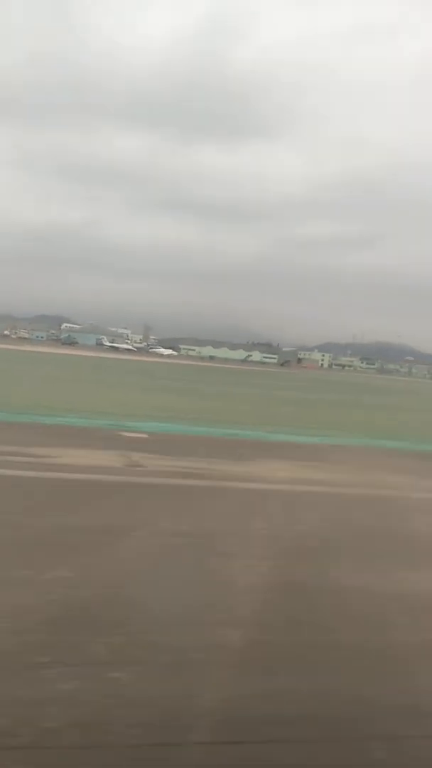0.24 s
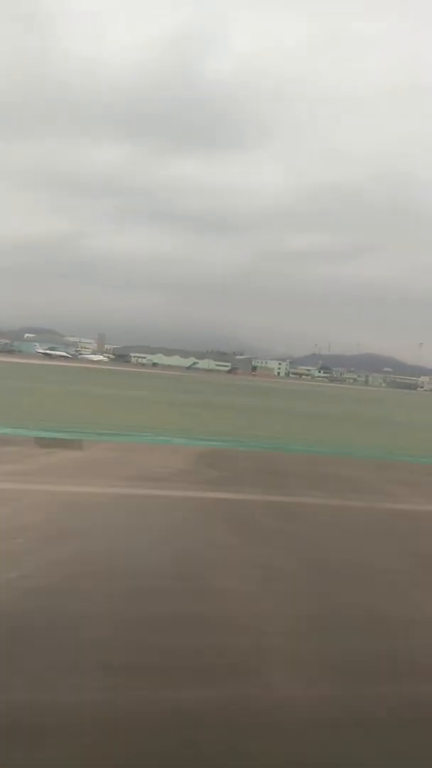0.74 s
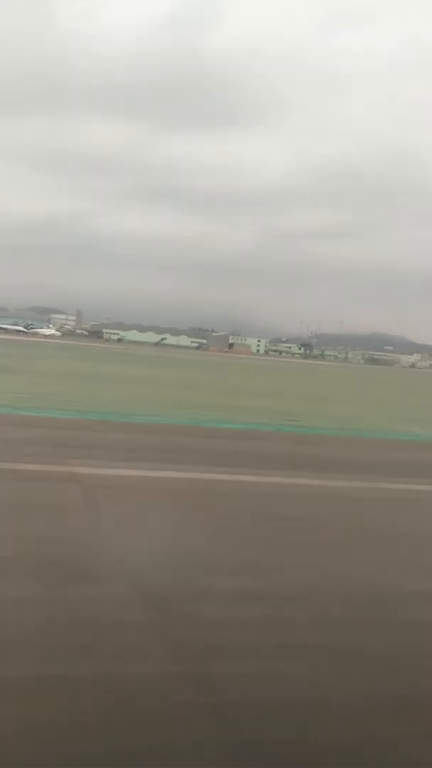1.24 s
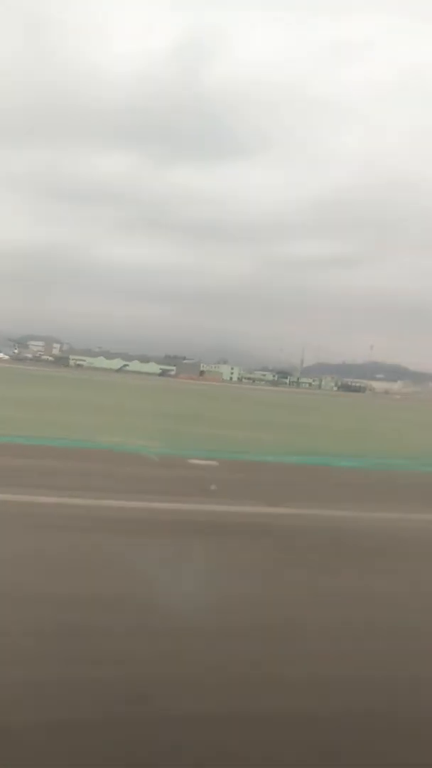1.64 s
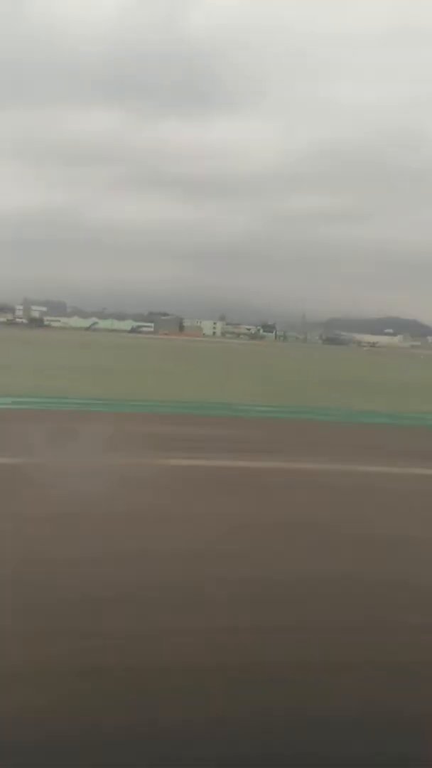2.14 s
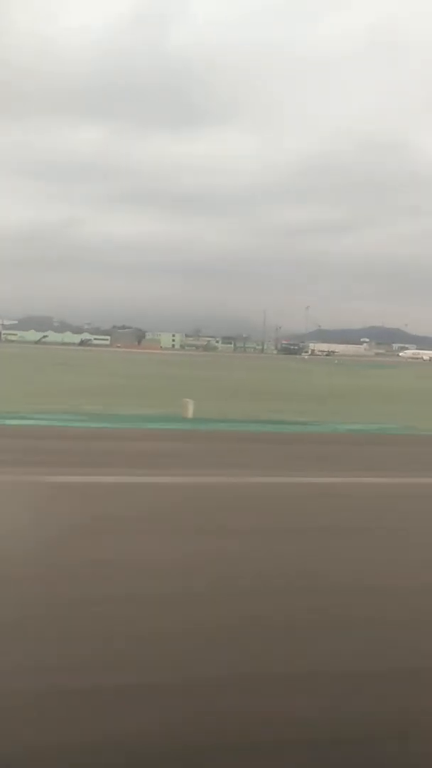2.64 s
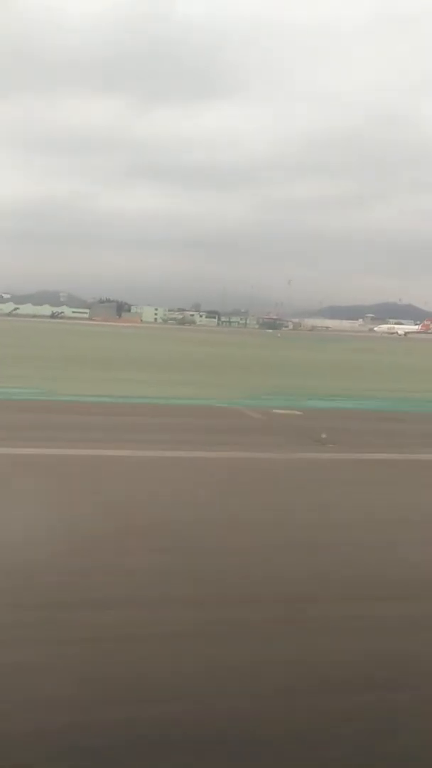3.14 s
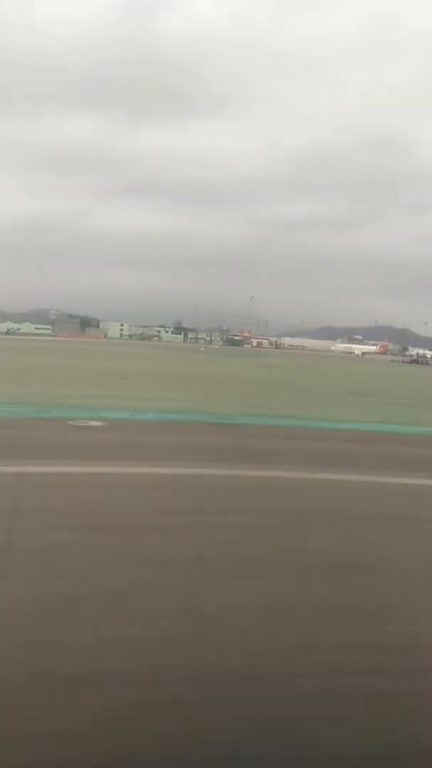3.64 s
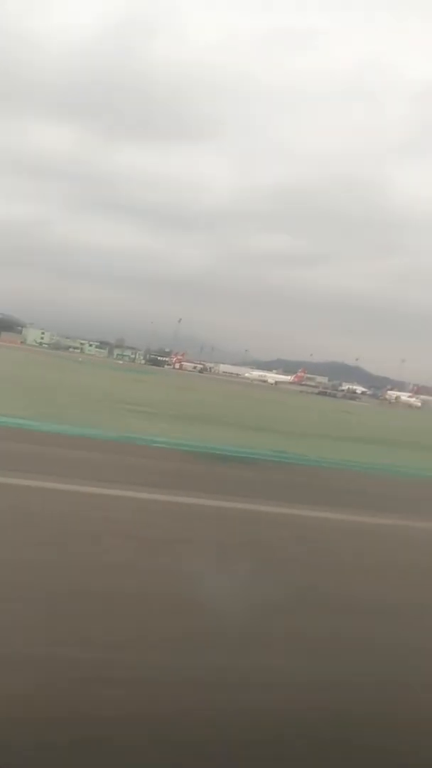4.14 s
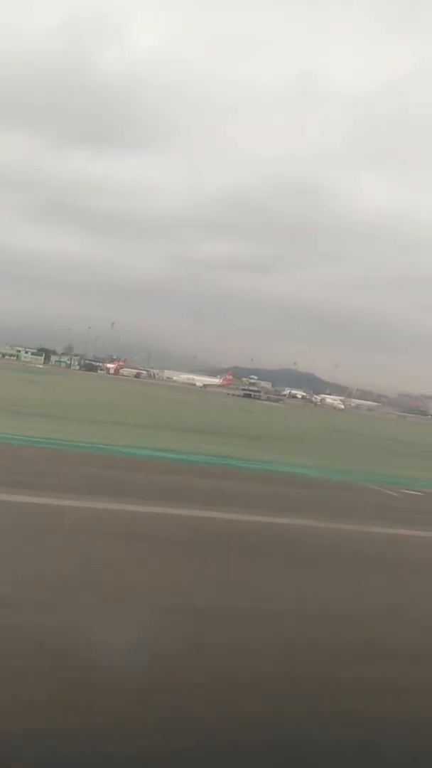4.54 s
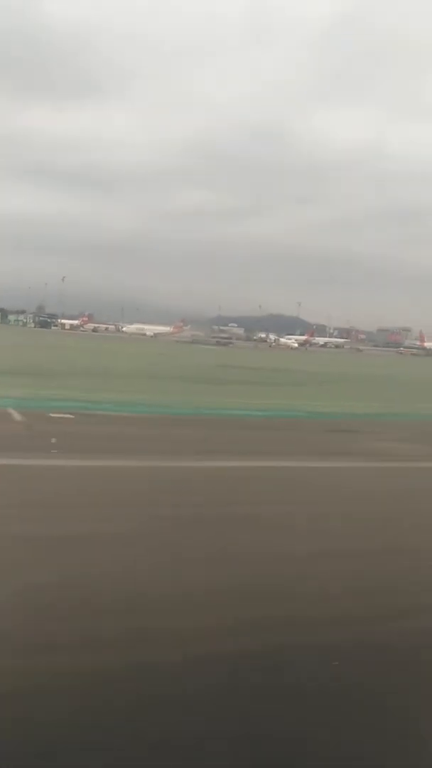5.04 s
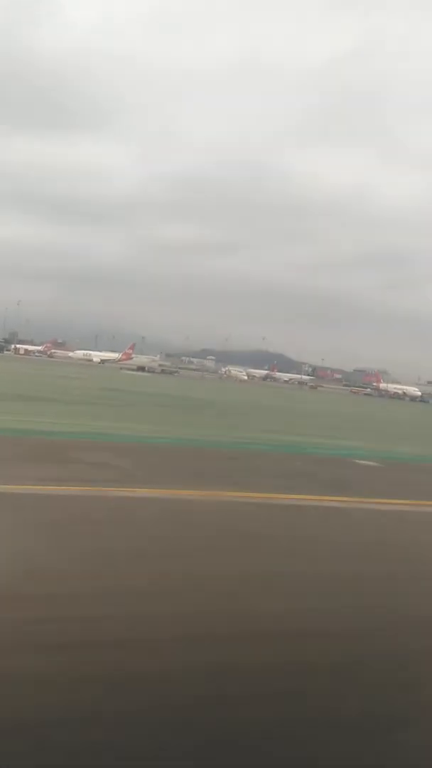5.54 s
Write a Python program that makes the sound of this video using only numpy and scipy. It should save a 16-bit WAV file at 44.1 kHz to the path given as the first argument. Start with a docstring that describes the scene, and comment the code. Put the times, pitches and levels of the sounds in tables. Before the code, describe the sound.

Inside an airliner cabin at a window seat, as the aircraft speeds along the runway after landing, for nearly six seconds. A deep, steady rumble of engines and tyres lies underneath, with a low hum that wavers and swells most around 3.3 to 3.8 s. From the very start, rough tarmac shakes the wall panel in abrupt, uneven bursts, about four a second: it judders, booms hollowly for an instant at the hardest bumps, and hard plastic chatters densely against it. Between bursts the rattle briefly thins as the plastic lifts off. Dry single taps, dull or crisp, stand out from 0.4 s, crowding around 4.3 to 4.5 s. Faint thin sizzles and short lower creaks slip through. Soft deep knocks fall at about 0.1, 0.5, 1.3, 1.6, 1.7, 2.9, 3.2, 5.2 and 5.5 s, the strongest leaning right. The shaking continues to the end, somewhat calmer after 5.5 s.

```python
"""An airliner rolls along the runway after landing, heard from a window seat.
From the start, engines and wheels fill the cabin with a rumble and a wavering hum, made of noise and a sine.
Rough stretches of tarmac, about four a second, shake the wall: it judders, booms briefly at the hardest
bumps, and hard plastic chatters against it. Slips sizzle and creak, and now and then a soft, deep knock falls.
Single hard taps stand out from 0.4 s on."""
import sys
import numpy as np
from scipy import signal
from scipy.fft import rfft, irfft
from scipy.io import wavfile
from scipy.ndimage import uniform_filter1d, minimum_filter1d

SR = 44100
rng = np.random.default_rng(int(sys.argv[2]) if len(sys.argv) > 2 else 0)


def file_out(sig):
    """Save sig as 16-bit WAV at sys.argv[1]."""
    # one column per channel
    cols = np.atleast_2d(sig).T
    # limit, then scale
    lim = np.clip(cols, -1, 1)
    pcm = np.round(lim * 32767).astype(np.int16)
    wavfile.write(sys.argv[1], SR, pcm)


N = 255339
TIME = np.arange(N) / SR  # seconds

# Rough stretches of tarmac. Each row: start in seconds, length in seconds, relative level of the wall judder
# in dB, relative level of the chatter in dB, how long the plastic lifts off just before the start in seconds.
STRETCHES = [(0.010, .215, -24.5, -41, 0.0037), (0.247, 0.069, -24.5, -41.5, 0.009),
             (0.369, 0.16, -25.5, -37.5, 0.034), (0.644, .148, -23.5, -35.5, 0.033),
             (0.844, .08, -25, -37, 0.0067), (0.997, 0.057, -25, -37, 0.0045),
             (1.09, 0.074, -22.5, -41, 0.01), (1.272, .28, -26, -41.5, 0.0042),
             (1.624, .19, -26.5, -42, 0.014), (1.948, .18, -25.5, -41, 0.013),
             (2.218, 0.27, -28.5, -41.5, 0.0029), (2.629, .045, -25.5, -36.5, .005),
             (2.746, .25, -23, -39.5, 0.019), (3.028, .145, -24.5, -39.5, 0.0038),
             (3.3, .143, -24.5, -40.5, 0.037), (3.629, .035, -23, -41.5, 0.0055),
             (3.729, .075, -18, -42, 0.0045), (3.903, .185, -27, -37.5, 0.04),
             (4.108, 0.1, -28, -38, 0.026), (4.395, 0.135, -28, -34.5, .006),
             (4.681, .2, -22, -41.5, 0.0073), (5.099, .11, -25.5, -43, 0.0062),
             (5.280, 0.057, -24, -44, 0.0039), (5.419, 0.051, -22, -39.5, .005)]
# The hardest bumps, which make the wall boom. Each row: middle in seconds, relative level in dB,
# pitch in Hz (it drifts around this), length in seconds.
BOOMS = [(0.036, -11, 282.8, 0.01), (0.094, -15.5, 191, 0.017), (0.139, -11.5, 215.7, 0.014),
         (0.175, -12.5, 238.1, .023), (0.261, -17, 280.8, 0.027), (0.392, -13, 219.9, .029),
         (0.455, -20, 342.2, .016), (0.519, -18.5, 282.5, 0.011), (0.755, -13.5, 276.1, 0.032),
         (0.913, -22, 291.4, 0.018), (1, -20, 375.3, .02), (1.108, -17, 189.8, .02),
         (1.132, -12.5, 260, .02), (1.376, -17, 257.4, 0.011), (1.535, -19.5, 301.1, 0.025),
         (1.752, -13, 250.4, .047), (1.895, -17, 223.8, 0.019), (1.992, -17.5, 322.2, 0.056),
         (2.235, -18, 294.4, .016), (2.66, -17, 217, 0.023), (2.764, -17, 350.2, .014),
         (2.808, -17, 263.8, 0.024), (2.85, -17, 188.3, .047), (2.905, -17, 270.2, .024),
         (2.948, -14, 280.6, .017), (2.984, -15, 272.2, 0.012), (3.09, -21.5, 321.3, 0.024),
         (3.345, -20, 249.8, .02), (3.385, -19, 278.5, 0.018), (3.522, -17, 275.2, 0.008),
         (3.751, -14.5, 281.1, 0.026), (3.779, -16.5, 212.9, 0.021), (4.007, -16.5, 287.1, 0.025),
         (4.193, -17, 215.4, .034), (4.241, -15, 192.3, 0.014), (4.398, -18, 337.2, .008),
         (4.436, -17, 220.2, .009), (4.466, -13.5, 301.4, 0.016), (4.528, -17, 381, .008),
         (4.771, -20, 210.7, 0.033), (4.823, -12.5, 252, 0.012), (4.862, -18, 319, 0.017),
         (5.121, -19, 305.2, 0.045), (5.429, -17, 246.9, 0.017)]
# Single hard taps of the plastic. Each row: time in seconds, relative level in dB,
# crispness (extra treble near 3000 Hz) in dB.
HARD_TAPS = [(0.3997, -26.5, 4), (0.4625, -30.5, 8), (0.5507, -25, -5), (0.611, -36.5, -8.5),
             (0.622, -40, -7), (0.6334, -35.5, 8.5), (0.6532, -34, 14), (0.6648, -34.5, 12),
             (0.7354, -29.5, 6), (0.8209, -46, 9.0), (0.8664, -25, 0), (0.8843, -25, -7), (0.9419, -41, 11),
             (1.0002, -36, 7), (1.0165, -22, -6.0), (1.0412, -34, -3), (1.0687, -31, 6), (1.1385, -39, 5),
             (1.1579, -32.5, 9), (1.2591, -29, 0), (1.3727, -25.5, 0), (1.5205, -27, 0),
             (1.5818, -33.5, 12), (1.6197, -29, -1), (1.884, -28, 3), (2.0162, -32, 5.5), (2.185, -36, 6),
             (2.3768, -27.5, 2.0), (2.5868, -34, 2.5), (2.6603, -31, -7), (2.7001, -49, 7),
             (2.7533, -34, -9), (2.8578, -31.5, 9), (3.0325, -32.5, 4), (3.3074, -29, -9),
             (3.421, -36, -12), (3.52, -36.5, 15), (3.6337, -32.5, -1), (3.7854, -30.5, -14),
             (3.9719, -27.5, 3), (4.0008, -22.5, -12), (4.0309, -38, 9), (4.0532, -28.5, 2.5),
             (4.1463, -26, -1), (4.2974, -29.5, -5.5), (4.3078, -32, -12), (4.3114, -44, -1),
             (4.331, -34, -5), (4.349, -34, 4), (4.3532, -33.5, -2), (4.3834, -35, 11), (4.3963, -25.5, 9),
             (4.4133, -26, 1.0), (4.4323, -29, 1), (4.4566, -27.5, 2), (4.4826, -30, 0),
             (4.5207, -30.5, 10), (4.5242, -27.5, 9.5), (4.6306, -29.5, -6), (4.822, -31, -8.5),
             (4.862, -28.5, -4.0), (4.8984, -31, 1), (4.924, -31, -3), (5.3861, -35, 3)]
# Tone of the plastic tapping the wall. Each row: frequency in Hz, relative level in dB.
TAP_TONE = [(40, -1), (130, 2), (310, 6), (410, 5.5), (490, 3), (660, -0.5), (1000, -8), (1500, -15),
            (2100, -21), (3000, -31), (4200, -43), (6200, -48.5), (8500, -62), (13000, -83.5)]
# How much left and right differ for the plastic. Each row: frequency in Hz, opposed minus shared part in dB.
TAP_WIDTH = [(100, -12), (300, -8.5), (600, -5), (1200, -0.5), (3000, 3), (9000, 1.5)]


def gain_of(db):
    """Turns decibels into amplitude."""
    return 10 ** (np.asarray(db) / 20)


def evened(x):
    """Scales a signal to an rms (average strength) of one."""
    return x / np.sqrt(np.mean(x ** 2) + 1e-20)


def read(points, hz):
    """Reads a spectrum between its points, along a log-frequency axis."""
    f, value = np.transpose(points)
    return np.interp(np.log(hz + 1), np.log(f + 1), value)


def colour(x, points, size=8192):
    """Filters to the given spectrum, causally: it rings only after it is struck."""
    hz = abs(np.fft.fftfreq(size, 1 / SR))
    log_gain = np.log(gain_of(read(points, hz)))
    minimum_phase = np.exp(np.conj(signal.hilbert(log_gain)))
    response = np.fft.ifft(minimum_phase).real[:size // 2]
    return signal.oaconvolve(x, response)[:len(x)]


def ring_strength(points):
    """How much a filter changes the strength of a single click; dividing by it leaves that strength alone."""
    return np.linalg.norm(colour(signal.unit_impulse(SR), points))


def smooth(x, seconds):
    """Triangular running mean: two plain running means of the given length, one after the other."""
    width = max(int(seconds * SR), 1)
    return np.maximum(uniform_filter1d(uniform_filter1d(x, width), width), 0)


def wander(hz):
    """Slow random motion with an rms of one, up to about the given rate."""
    size = 2 ** 18
    spectrum = rfft(rng.standard_normal(size))
    slow = np.exp(-(np.fft.rfftfreq(size, 1 / SR) / hz) ** 2)
    return evened(irfft(spectrum * slow)[:N])


def noise(points):
    """Noise of the given spectrum with an rms of one; the first second, where the filter starts, is dropped."""
    return evened(colour(rng.standard_normal(N + SR), points)[SR:])


def left_right(mid, side):
    """Makes left and right from their shared and opposed parts."""
    return np.array([mid + side, mid - side])


def swell(s, length):
    """The samples of a short event and its bell-shaped rise and fall; length is the width at half height."""
    at = np.flatnonzero(abs(TIME - s) < 2 * length)
    return at, .5 ** ((2 * (TIME[at] - s) / length) ** 2)


def surge(depth_db, rate_hz, span_s):
    """Uneven spurts of strength that roughly keep the mean power over span_s."""
    spurts = gain_of(depth_db * wander(rate_hz))
    return spurts / np.sqrt(smooth(spurts ** 2, span_s) + 1e-6)


def shaking(column):
    """Amplitude of the wall judder (column 1) or chatter (column 2): calm, but for the rough stretches."""
    # Shaking on the smoother tarmac in between.
    # Each row: time in seconds, relative level of the wall judder in dB, relative level of the chatter in dB.
    calm_levels = np.array([(0, -33, -41), (1.3, -32.5, -41.5), (2.5, -33.5, -43.5), (3.8, -37.5, -45),
                            (4.7, -28.5, -41), (5.2, -33, -46), (5.79, -32, -48.5)])
    early_s, attack_s, release_s = 0.0018, 0.0039, 0.013  # starts abruptly, holds, and dies away
    calm = gain_of(np.interp(TIME, calm_levels[:, 0], calm_levels[:, column]))
    level = calm
    for row in STRETCHES:
        t = TIME - row[0] + early_s
        rise = np.clip(t / attack_s, 0, 1)
        fall = np.exp(-np.maximum(t - row[1], 0) / release_s)
        level = np.maximum(level, calm + rise * fall * (gain_of(row[1 + column]) - calm))
    return level


def cabin(level_db=-30, waver=0.012, throb_db=2):
    """Engines and tyres through the fuselage: deep, steady noise with a wavering hum in it."""
    # Tone of the rumble. Each row: frequency in Hz, relative level in dB.
    rumble_tone = [(20, -16), (32, -25), (44, -1), (53, 5.5), (72, 4), (105, 7.5), (150, -0.5), (230, -9.5),
                   (390, -22), (500, -27), (1000, -38), (2000, -50), (4500, -60), (9000, -80)]
    # How much left and right differ. Each row: frequency in Hz, opposed minus shared part in dB.
    rumble_width = [(30, -21.5), (70, -24.5), (150, -12), (300, -7), (600, -3.5), (1500, 8), (8000, -1.5)]
    # The deep hum rises and sinks. Each row: time in seconds, pitch in Hz (before the waver), level in dB.
    hum_path = [(0, 53.86, -50.5), (1.4, 57, -44), (2.4, 54, -50), (3.301, 56.6, -36),
                (3.802, 49.33, -36.5), (4.3, 49.6, -42), (4.9, 55.8, -39.5), (5.2, 56.7, -45.5),
                (5.5, 48.45, -42.5), (5.79, 48.4, -50)]
    s, pitch, hum_db = np.transpose(hum_path)
    hz = np.interp(TIME, s, pitch) * (1 + waver * wander(5))
    throb = gain_of(throb_db * wander(3.6))
    hum = evened(throb * np.sin(2 * np.pi * np.cumsum(hz) / SR))
    rumble = left_right(noise(rumble_tone), colour(noise(rumble_tone), rumble_width))
    return gain_of(level_db) * rumble + gain_of(np.interp(TIME, s, hum_db)) * hum


def wall(drive, judder_db=1.5, boom_db=1.5, glide=0.13, glide_hz=75, rough=0.33):
    """The wall panel judders all the time and swings for a few uneven cycles at each hard bump."""
    # Tone of the judder. Each row: frequency in Hz, relative level in dB.
    judder_tone = [(50, -31.5), (95, -2), (170, 5), (300, 6.5), (400, 0.5), (500, -13.5), (700, -20.5),
                   (1000, -25.5), (1600, -76.5)]
    # How much left and right differ. Each row: frequency in Hz, opposed minus shared part in dB.
    wall_width = [(100, -22), (300, -14), (450, -18), (700, -16), (1500, -5)]
    judder = noise(judder_tone)
    judder /= np.sqrt(smooth(judder ** 2, 0.061) + 1e-6)  # flatten the noise's own slow swells
    level = gain_of(judder_db) * shaking(column=1) * drive
    mid, power = level * judder, level ** 2
    drift, uneven = np.exp(glide * wander(glide_hz)), 1 + rough * wander(130)
    for (s, db, hz, length), start in zip(BOOMS, rng.random(len(BOOMS))):
        at, bell = swell(s, length)
        swing = bell * uneven[at]
        # uneven, but as strong as a plain bell
        swing *= gain_of(db + boom_db) * np.linalg.norm(bell) / np.linalg.norm(swing)
        turns = start + np.cumsum(hz * drift[at]) / SR
        mid[at] += np.sqrt(2) * swing * np.sin(2 * np.pi * turns)
        power[at] += swing ** 2
    side = colour(np.sqrt(power) * noise(judder_tone), wall_width)
    return left_right(mid, side)


def seated(depth_db=-13, tap_share=0.32):
    """How firmly the plastic rests on the wall: it lifts before rough stretches and hard taps, and in lulls."""
    # Lulls on smooth tarmac, when the plastic hangs free. Each row: middle in seconds, length in seconds.
    free_times = [(0.345, .02), (0.572, 0.014), (0.62, .02), (0.806, .016), (1.232, .014), (2.416, .015),
                  (2.729, 0.014), (3.267, .022), (3.459, 0.017), (3.856, .028), (4.3, .025), (4.335, .025),
                  (4.545, .012), (4.665, .01), (5.005, 0.022)]
    tap_lift_s = .01  # the plastic is in the air this long before a hard tap
    lifts = [(start - lift / 2, lift, 1) for start, _, _, _, lift in STRETCHES]
    lifts += [(s - tap_lift_s / 2, tap_lift_s, tap_share) for s, _, _ in HARD_TAPS]
    lifts += [(s, length, 1) for s, length in free_times]
    lifted = np.zeros(N)
    for s, length, share in lifts:
        at, bell = swell(s, length)
        lifted[at] += share * np.minimum(2 * bell ** 2, 1)
    return gain_of(depth_db * np.minimum(lifted, 1))


def bounces(rate, uneven, count=16000):
    """One click at each bounce, at the given rate a second; the flights in between are of uneven length."""
    flights = np.exp(uneven * rng.standard_normal(count))
    at = np.searchsorted(np.cumsum(rate) / SR, np.cumsum(flights / flights.mean()))
    return np.bincount(at[at < N], minlength=N)


def contact(blows, hard_db, scatter=0.79, edge_hz=2200, size=256):
    """One point of contact: a dry click that fades in about a millisecond; a hard point is brighter."""
    t = np.arange(size) / SR
    near, across = rng.standard_normal((2, size)) * np.exp(-t / .00035)
    near = scatter * near / np.linalg.norm(near) + (t == 0)
    pair = np.array([near / np.linalg.norm(near), across / np.linalg.norm(across)])
    clicks = evened(pair) / np.sqrt(size)
    treble = signal.lfilter(*signal.butter(1, edge_hz, "high", fs=SR), clicks)
    clicks = clicks + (gain_of(hard_db) - 1) * treble
    sides = rng.choice([-1., 1.], N)  # each blow leans to left or right
    return signal.oaconvolve(np.array([blows, blows * sides]), clicks, axes=1)[:, :N]


def clacks(level_db, spill=0.48, spill_s=0.00065, soft_hz=4000, size=256):
    """Hard single taps and landings: a click, dull or crisp, inside a very short scrape."""
    landing_db = 0.5  # the tap that opens each rough stretch, added to that stretch's chatter level
    out = np.zeros((2, N + size))  # shared and opposed parts
    t = (np.arange(size) - size // 2) / SR
    hits = [*HARD_TAPS] + [(start, db + landing_db, 0) for start, _, _, db, _ in STRETCHES]
    for (s, db, crisp_db), scatter in zip(hits, rng.standard_normal((len(hits), 2, size))):
        click = scatter * np.exp(-abs(t) / spill_s)
        click *= spill / np.linalg.norm(click[0])
        click[0] -= t == 0
        tone = [(400, -6), (1400, 0), (3000, crisp_db), (9000, 0)]  # Hz, dB
        click = np.array([colour(part, tone, size=512) for part in click])
        first = round((s + t[0]) * SR)
        out[:, first:][:, :size] += gain_of(db + level_db) * click
    out = signal.lfilter(*signal.butter(1, soft_hz, fs=SR), out)  # the plastic gives a little
    return out[:, :N] / ring_strength(TAP_TONE)


def chatter(drive, taps_per_s=400, crowding=.45, uneven=.55, spread_db=3.5, rub=0.1, base_db=9.5,
            boom_db=-14.5, clack_db=29, hard_db=5, roam=4, roam_hz=9, count=16):
    """Plastic bounces on the wall: sparser taps when calm, denser in every boom; it rubs more if shaken hard."""
    usual_hz = 260  # boom pitch at which the rattle has its plain strength
    power = (gain_of(base_db) * shaking(column=2) * drive) ** 2
    for s, db, hz, length in BOOMS:
        at, bell = swell(s, length)
        power[at] += (gain_of(db + boom_db) * bell * hz / usual_hz) ** 2  # a faster swing rattles harder
    force = np.sqrt(power)
    pressure = force / np.median(force)
    sizes_db = spread_db * np.clip(rng.standard_normal(N), -2, 2)
    taps = bounces(taps_per_s * pressure ** crowding, uneven) * gain_of(sizes_db)
    taps /= np.sqrt(smooth(taps ** 2, 0.0039) + 0.38 * np.mean(taps ** 2))  # a few big bounces or many small
    rubbing = rub * np.minimum(pressure, 2) * rng.standard_normal(N)
    blows = force * (rubbing - taps)
    blows /= ring_strength(TAP_TONE)
    # the point of contact roams between soft and hard spots, so the tone of the flurries varies
    point = np.floor(roam * wander(roam_hz) + 2.5 * rng.standard_normal(N)) % count
    hardness = rng.permutation(np.linspace(-2 * hard_db, hard_db, count))
    struck = sum(contact(blows * (point == k), hardness[k]) for k in range(count))
    mid, side = struck + clacks(clack_db)
    return left_right(colour(mid, TAP_TONE), colour(colour(side, TAP_TONE), TAP_WIDTH))


def ticks(seat, per_s=120, level_db=-16, spread_db=3.5, follow=0.72):
    """The edge of the plastic touches the wall at random in light ticks, stronger the more it shakes."""
    # Tone of a tick. Each row: frequency in Hz, relative level in dB.
    tick_tone = [(60, -2.5), (300, 3.5), (700, 3.5), (1500, -5), (3000, -23.5), (4200, -28.5),
                 (6200, -40.5), (9000, -54.5), (13000, -71.5)]
    shake = shaking(column=2)
    firmness = (shake / np.median(shake)) ** follow * seat ** 0.43
    sizes = gain_of(level_db + spread_db * np.clip(rng.standard_normal(N), -2, 2))
    touches = (rng.random(N) < per_s / SR) * sizes * firmness
    shares = 1 + 0.45 * rng.uniform(-2.1, 1, (2, N))  # each tick reaches left and right unequally
    return np.array([colour(-touches * share, tick_tone) for share in shares]) / ring_strength(tick_tone)


def scuff(seat, level_db=-58.5, follow=0.8):
    """The plastic scuffs the wall with a faint hiss that grows with the shaking and sinks when it lifts."""
    # Tone of the hiss. Each row: frequency in Hz, relative level in dB.
    hiss_tone = [(200, -13), (700, 0.5), (1200, -1.5), (2000, 2), (3400, -4), (4500, -13), (6000, -21),
                 (9000, -42.5)]
    shake = shaking(column=2)
    strength = gain_of(level_db) * (shake / np.median(shake)) ** follow * seat
    return strength * np.array([noise(hiss_tone), noise(hiss_tone)])


def slips(sharp=14, width_hz=400, flutter_db=3):
    """Plastic slips on the wall: bursts of fluttering, narrow noise, as thin sizzles or short, lower creaks."""
    # Each row: middle in seconds, length in seconds, centre frequency in Hz, relative level in dB.
    slip_list = [(0.033, 0.033, 6000, -64), (0.041, 0.022, 1004, -36.5), (0.13, 0.093, 5512, -67.5),
                 (0.135, 0.0089, 12020, -68), (0.309, 0.021, 5720, -68.5), (0.403, 0.059, 5650, -66.5),
                 (0.417, .012, 614.3, -40), (0.674, 0.056, 6660, -75), (0.73, 0.15, 5524, -67.5),
                 (0.784, 0.017, 803, -43), (0.886, 0.012, 622, -33), (0.909, 0.11, 5450, -68),
                 (1.017, 0.021, 940, -39), (1.021, 0.12, 5485, -69), (1.048, 0.046, 1496, -42.5),
                 (1.148, 0.041, 5652, -66), (1.16, 0.019, 1357, -37), (1.735, 0.12, 5410, -70.5),
                 (2.014, 0.035, 5440, -68.5), (2.464, 0.078, 5630, -74), (2.7646, .012, 611, -37.5),
                 (2.8065, 0.013, 598.5, -38), (3.318, 0.043, 5430, -71.5), (3.646, .012, 599.4, -37.5),
                 (3.961, 0.011, 651, -37), (4.004, 0.015, 1031, -34), (4.157, 0.11, 6220, -76),
                 (4.397, 0.0093, 7294, -68), (4.4156, 0.01, 678, -33), (4.425, 0.068, 6670, -73),
                 (4.8225, .012, 651.4, -34), (4.8635, 0.014, 622, -45), (5.12, 0.029, 694.4, -43)]
    out, flutter = np.zeros((2, N)), evened(gain_of(flutter_db * wander(200)))
    for s, length, hz, db in slip_list:
        at, bell = swell(s, length)
        half = min(width_hz + hz / sharp, hz) / 2
        band = signal.butter(2, [hz - half, hz + half], "band", fs=SR, output="sos")
        ringing = signal.sosfilt(band, rng.standard_normal((2, SR)))[:, -len(at):]
        mid, side = ringing * bell * flutter[at]
        ring = left_right(mid, gain_of(read(TAP_WIDTH, hz)) * side)
        out[:, at] += gain_of(db) * ring * np.linalg.norm(bell) / np.linalg.norm(mid)
    return out


def knocks(length_s=0.026, sag_per_s=7):
    """Soft, deep knocks: each is a few slow sine cycles that sag in pitch, with no rattle."""
    # Each row: middle in seconds, level on the right in dB, pitch at the middle in Hz, left minus right in dB.
    knock_list = [(0.11, -26, 146.2, -3.5), (0.479, -26.5, 105.4, 2.5), (1.318, -13.5, 108.2, -13.5),
                  (1.567, -21.5, 101.4, -0.5), (1.682, -14, 107.1, -16), (2.866, -20, 135, 4),
                  (3.195, -21.5, 104.3, -4.5), (5.223, -22.5, 99.78, -7), (5.467, -19.5, 100.8, 2)]
    out = np.zeros((2, N))
    for (s, db, hz, left_db), start in zip(knock_list, rng.random(len(knock_list))):
        at, bell = swell(s, length_s)
        turns = start + np.cumsum(hz * np.exp(-sag_per_s * (TIME[at] - s))) / SR
        out[:, at] += np.sqrt(2) * gain_of([[db + left_db], [db]]) * bell * np.sin(2 * np.pi * turns)
    return out


def scene(wall_lift=1.0, chatter_lift=.9, scuff_lift=.45, shared=.35):
    """Adds up all sounds; small bumps and the grain of the tarmac move wall and chatter by their own amounts."""
    # Resonances of the wall panel, heard in everything that shakes it. Each row: frequency in Hz, gain in dB.
    panel_tone = [(135, 0.5), (195, 2), (258, -4.5), (315, 1.5), (348, -0.5), (395, 2), (480, -1.5),
                  (640, -1), (950, -2.5), (1700, -4), (3200, -2)]
    bumps = surge(depth_db=2.5, rate_hz=32, span_s=0.04)
    grain = surge(depth_db=4.0, rate_hz=66, span_s=.04)
    spurts, seat = bumps * grain, seated()
    flurries = spurts ** shared * surge(depth_db=2.5, rate_hz=90, span_s=.025)
    shaken = wall(seat ** wall_lift * spurts)
    shaken = shaken + chatter(seat ** chatter_lift * flurries)
    shaken = shaken + ticks(seat) + scuff(seat ** scuff_lift)
    panel = np.array([colour(channel, panel_tone) for channel in shaken])
    return cabin() + panel + slips() * seat ** .35 + knocks()


def record(dry, ceiling_db=-6.0, bass_hz=38, edge_hz=14000):
    """Soft ends; the microphone sheds the deepest bass; a limiter holds the biggest swings; treble is cut."""
    eased = dry * signal.windows.tukey(N, .002)
    thinned = signal.sosfilt(signal.butter(7, bass_hz, "high", fs=SR, output="sos"), eased)
    allowed = 1 / np.maximum(abs(thinned).max(0) / gain_of(ceiling_db), 1)
    held = thinned * smooth(minimum_filter1d(allowed, size=512), .005)
    low_pass = signal.firwin(511, edge_hz, window=("kaiser", 9), fs=SR)
    return signal.oaconvolve(held, low_pass[None], "same")


dry = scene()
out = record(dry)
file_out(out)
```